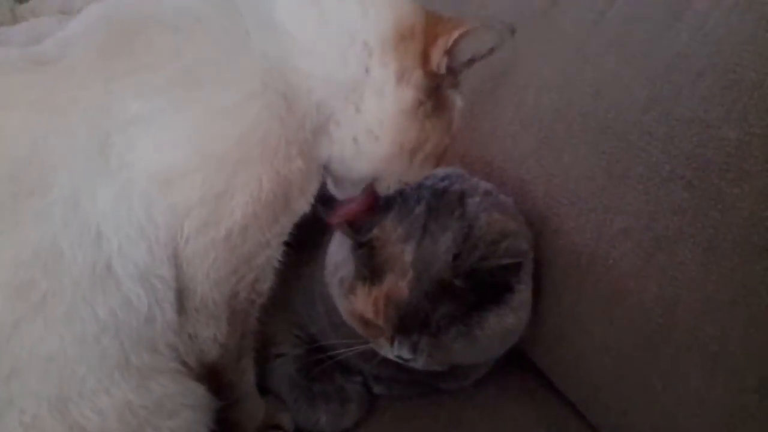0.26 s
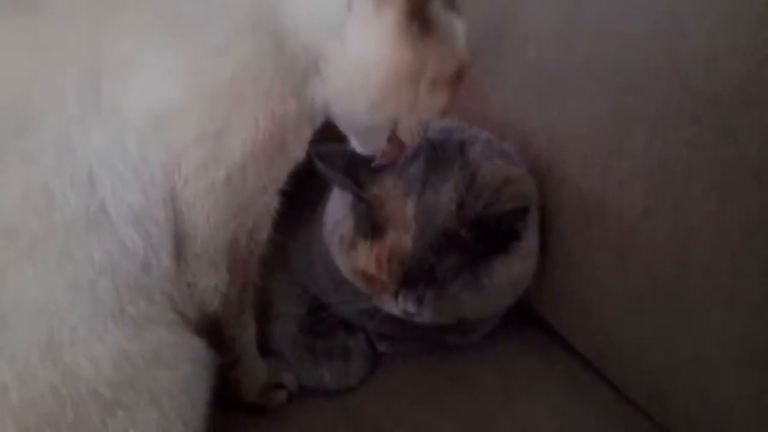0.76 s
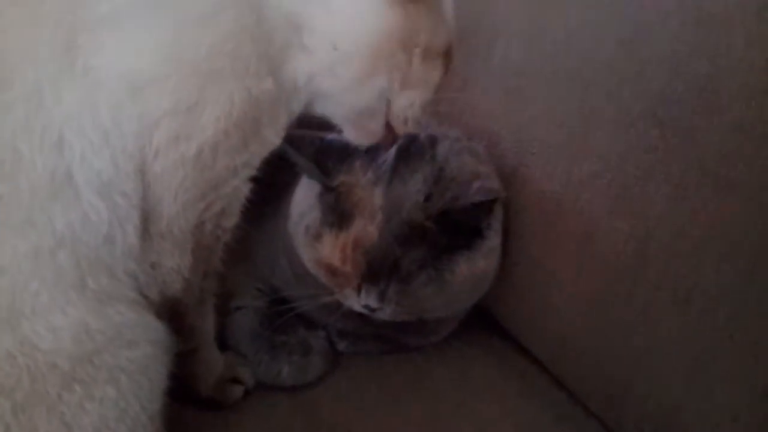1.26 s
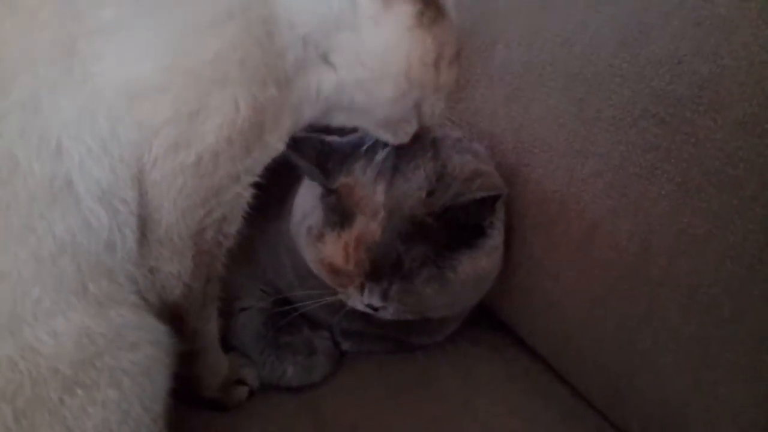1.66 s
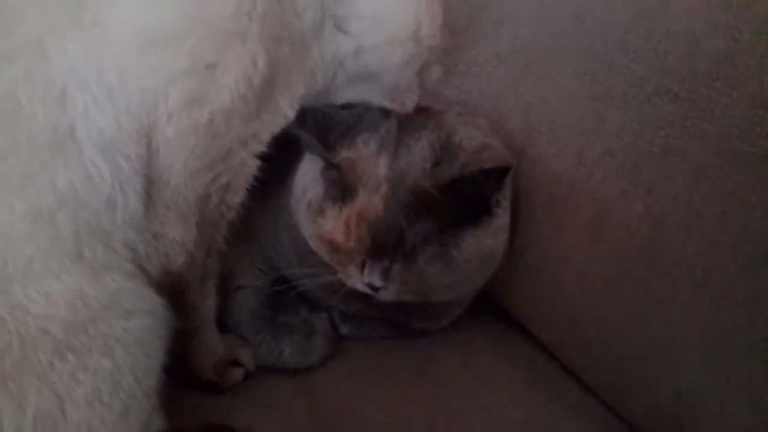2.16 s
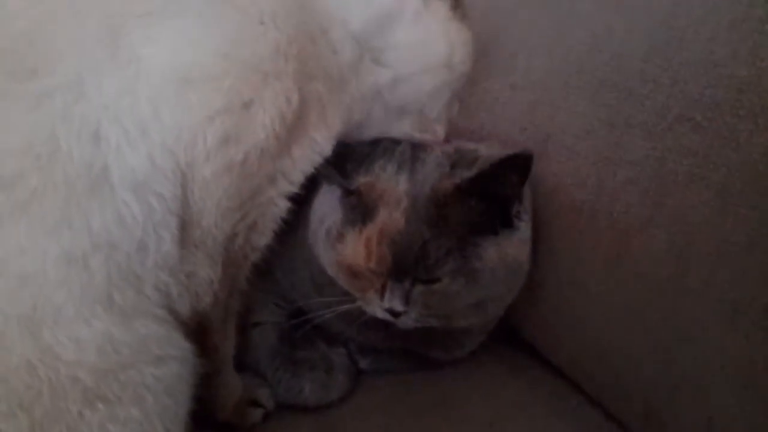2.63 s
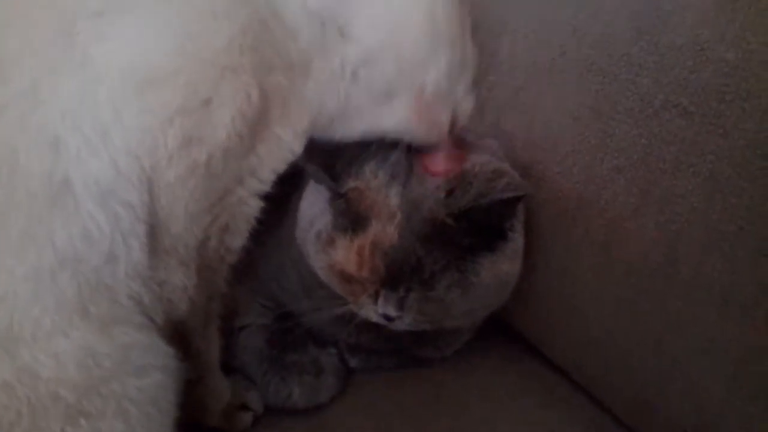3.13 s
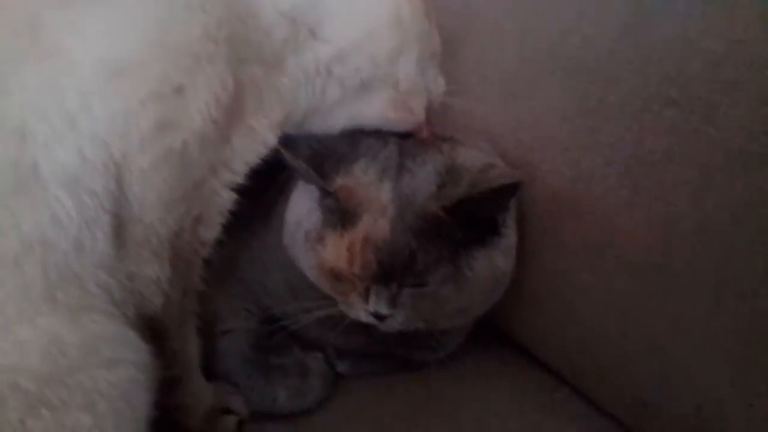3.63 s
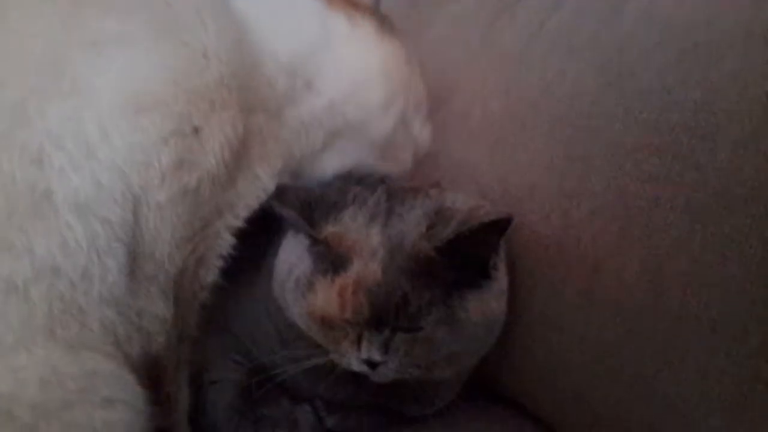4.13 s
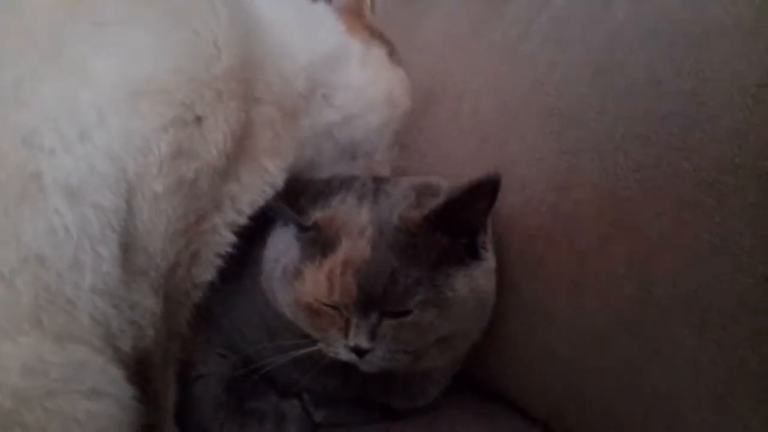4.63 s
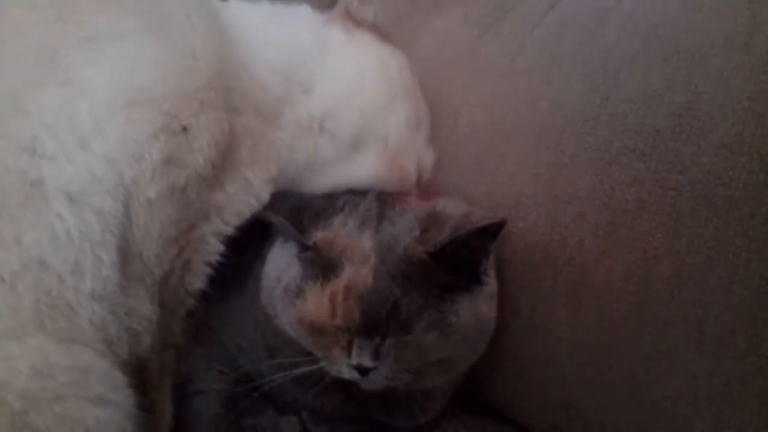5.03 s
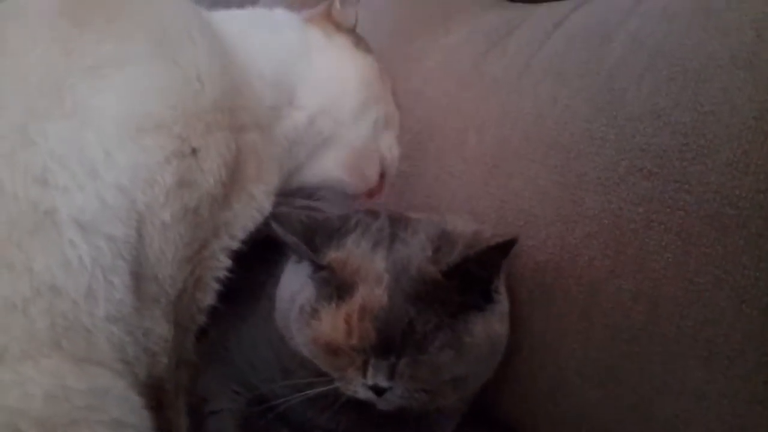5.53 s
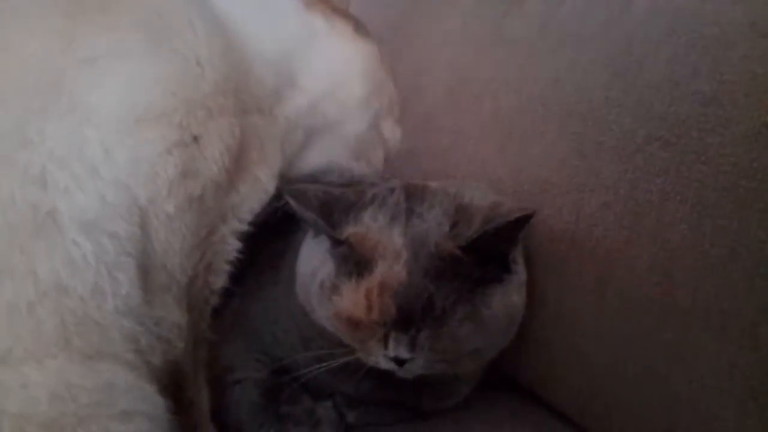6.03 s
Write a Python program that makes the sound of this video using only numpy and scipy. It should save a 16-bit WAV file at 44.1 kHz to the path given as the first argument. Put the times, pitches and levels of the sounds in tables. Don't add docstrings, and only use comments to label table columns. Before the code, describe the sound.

A quiet room with very faint low hum and slight hiss, heard through a close hand-held phone. At about 0.1 s a cat's rough tongue makes a crisp rasp through fur, followed by softer licks at 0.25, 0.35 and 0.5 s, with a sharp tick near 0.35 and a barely audible thin rising squeak around 0.45. From 0.6 to 1.7 s there is near silence with soft finger knocks and a brighter click at 1.16. Licking returns faintly at 1.7, then runs quickly from 1.85 to about 4.5 s, roughly four or five strokes a second, each a short bright swell with snapping hairs and an abrupt fade; one snap stands out at 3.23. Handling rumbles softly near 3.9, with clicks at 3.8 and 4.13 and the loudest, hard double click at 4.19. Strokes fade by 4.7 as rattly knocks cluster until 4.8; afterwards just quiet room tone.

```python
import sys
import numpy as np
from scipy import signal
from scipy.fft import rfft, irfft
from scipy.io import wavfile
from scipy.ndimage import uniform_filter1d

SR = 44100
rng = np.random.default_rng(int(sys.argv[2]) if len(sys.argv) > 2 else 0)


def natural_amplitude(level_db):
    exponent = np.asarray(level_db, float) / 20
    return 10 ** exponent


def inscribe(sig):
    pcm = np.round(np.clip(np.atleast_2d(sig).T, -1, 1) * 32767)
    wavfile.write(sys.argv[1], SR, pcm.astype(np.int16))


N = 277389

# full pull at [s], rasp level [dB], climb [s], hold [s], weight on the fur [dB].
STROKES = [(0.081, -46, 0.046, 0.0032, 3.5), (.243, -55, .07, 0, 7), (.342, -51.5, .024, 0, 4.5),
           (.494, -62, .045, .005, 1.5), (.545, -63.5, .05, .02, -3), (1.702, -66.5, 0.032, .005, -5.5),
           (1.845, -53, .026, 0.0022, -4), (2.05, -55, .06, 0.0021, 0.5), (2.205, -46.5, .045, 0.00084, -2),
           (2.34, -52, .06, .005, 3), (2.38, -48, .05, 0, -3), (2.555, -46, 0.059, .02, 0),
           (2.796, -43.5, 0.046, .012, 0), (3.0, -46, 0.083, .01, 1), (3.06, -53.5, .05, .01, -2.5),
           (3.233, -47.5, .07, .02, 0), (3.452, -46.5, .085, 0.0018, -1.5),
           (3.665, -48, 0.057, 0.028, -0.5), (3.885, -52, .055, .005, 4), (4.096, -53.5, 0.039, .02, 0.5),
           (4.17, -43.5, 0.045, .008, 4), (4.355, -56, .03, .01, 1), (4.531, -57, .016, 0.02, 0),
           (4.712, -69, .04, .03, 0)]
# frequency [Hz], level [dB per Hz].
RASP = [(3180, -39.5), (5400, -14.5), (5690, -12), (6540, -8), (7560, 0), (7770, 3), (8130, -5.5),
        (8400, -9.5), (10500, -35), (13600, -61.5), (22000, -120)]
# frequency [Hz], width [Hz], level [dB].
HOLLOW = [(2320, 500, -12.5), (3250, 1300, -8.5), (4185, 860, 2), (4868, 860, 1), (5530, 600, 1.5)]
# frequency [Hz], level [dB per Hz].
SIZZLE = [(9000, -9.5), (10300, 0), (12500, -7), (15500, -15.5), (16500, -40.5)]


def level(x, db):
    return x * natural_amplitude(db) / np.sqrt(np.mean(x ** 2))


def response(points, size=1024):
    hz, db = np.transpose(points)
    grid_hz = np.arange(size + 1) * SR / (2 * size)
    log_gain = np.interp(np.log(grid_hz + 1), np.log(hz), db) * np.log(10) / 20
    cepstrum = irfft(log_gain)
    cepstrum[1:size] *= 2
    cepstrum[size + 1:] = 0
    return irfft(np.exp(rfft(cepstrum)))[:size]


def colour(x, points):
    return signal.fftconvolve(x, response(points, size=8192))[:N]


def resonate(x, peaks):
    out = 0
    for k, (hz, width, db) in enumerate(peaks):
        b, a = signal.iirpeak(hz, hz / width, fs=SR)
        once = signal.lfilter(b, a, x)
        out = out + (-1) ** k * natural_amplitude(db) * signal.lfilter(b, a, once)
    return out


def ring(modes, size=2048):
    t = np.arange(size) / SR
    y = np.zeros(size)
    for hz, db, t60 in modes:
        y += natural_amplitude(db) * np.sin(2 * np.pi * hz * t) * np.exp(-np.log(1000) * t / t60)
    return y / np.abs(y).max()


def burst(kernel, length_s, noise):
    t = np.arange(len(noise)) / SR
    push = np.exp(-.5 * ((t - 3 * length_s) / length_s) ** 2)
    y = np.convolve(noise * push, kernel)
    return y / np.abs(y).max()


def add(out, s, x):
    i = int(s * SR) - np.argmax(np.abs(x))
    out[i:i + len(x)] += x[:N - i]


def walk(rate):
    k = int(SR / rate)
    steps = np.repeat(rng.standard_normal(N // k + 1), k)
    return 1.5 * uniform_filter1d(uniform_filter1d(steps, k), k)[:N]


def restless(x, peaks, wander_db, rate):
    out = 0
    for k, peak in enumerate(peaks):
        out = out + (-1) ** k * natural_amplitude(wander_db * walk(rate)) * resonate(x, [peak])
    return out


def room():
    # frequency [Hz], level [dB per Hz].
    quiet = [(12, -35), (20, -8), (32, -22), (101, -11.5), (228, -15), (277, -17.5), (319, -18.5),
             (472, -24.5), (513, -29.5), (558, -25.5), (802, -30.5), (1810, -36), (3950, -43.5),
             (7730, -41), (16000, -44)]
    # middle [s], half length [s], frequency [Hz], level [dB].
    hums = [
        (7.8, 0.046, 289, -74),
        (4.28, 0.0025, 830, -66),
    ]
    t = np.arange(N) / SR
    air = level(colour(rng.standard_normal(N) * natural_amplitude(0.88 * walk(4.8)), quiet), -76.5)
    for s, half, hz, db in hums:
        swell = np.exp(-.5 * ((t - s) / half) ** 2)
        air = air + natural_amplitude(db + 6.5) * swell * np.sin(2 * np.pi * hz * t)
    return air


def stroke_db(t, s, db, rise, hold, fade=271.5):
    rise_db, rise_bend = 28.5, 1.3
    settle_db, settle_db_per_s = -22, 52
    after = np.clip(t - s - hold, 0, None)
    climb = rise_db * np.clip((s - t) / rise, 0, 5) ** rise_bend
    fall = natural_amplitude(-fade * after) ** 2 + natural_amplitude(settle_db - settle_db_per_s * after) ** 2
    return db - climb + 10 * np.log10(fall)


def hairs(pull):
    per_s, scatter_db, biggest_db = 600, 5.0, 13
    slip_s, hiss = 0.00041, 0.54
    happens, size = rng.random((2, N))
    size_db = np.minimum(-scatter_db * np.log(1 - size), biggest_db)
    snaps = (happens < per_s / SR) * natural_amplitude(size_db)
    gate = signal.lfilter([1], [1, -np.exp(-1 / (slip_s * SR))], snaps)
    share = np.clip(pull * (1 - hiss), 0, 1)
    return np.sqrt(share * gate ** 2 / np.mean(gate ** 2) + 1 - share)


def tongue():
    # frequency [Hz], width [Hz], level [dB].
    fur = [(760, 680, 0.5), (1330, 1000, -6.5), (2200, 1800, -6.5)]
    # full pull at [s], rasp level [dB], climb [s], hold [s], fade [dB per s].
    brushes = [
        (.005, -70.5, .05, .03, 101.5),
        (.68, -78, .1, 0.059, 70.5),
        (1, -84.5, .03, 0.0299, 80.5),
        (4.85, -85, .08, .1, 50.5),
        (4.1, -58.5, .03, .01, 270),
        (3.185, -55.5, 0.024, .01, 272),
    ]
    t = np.arange(0, N + 64, 32) / SR

    def fine(curve):
        return np.interp(np.arange(N) / SR, t, curve)

    rows = [row[:4] for row in STROKES] + brushes
    power = np.array([natural_amplitude(stroke_db(t, *row)) ** 2 for row in rows])
    total = power.sum(axis=0)
    rasp_db = fine(10 * np.log10(total))
    weight_db = fine(np.array(STROKES)[:, 4] @ power[:len(STROKES)] / total)
    softer = np.clip(-45 - rasp_db, None, 50)
    hollow_db = -9.5 + .13 * softer
    drag_db = -23 + .42 * softer
    sizzle_db = -33 + 0.24 * softer
    climb_db_per_s = uniform_filter1d(np.gradient(rasp_db) * SR, 600)
    pull = np.clip(climb_db_per_s / 250 + 0.65, 0, 1)
    scrape = hairs(pull) * rng.standard_normal((4, N))
    rasp = level(colour(scrape[0], RASP), -0.97) * natural_amplitude(1.8 * walk(40))
    mouth = restless(scrape[1], HOLLOW + [(6900, 550, 2.3)], 3.0, 16)
    hollow = level(mouth, 0.087) * natural_amplitude(hollow_db + 1.8 * walk(25))
    drag = level(restless(scrape[2], fur, 1.3, 18), 0.087)
    drag = drag * natural_amplitude(drag_db + weight_db + 1.5 * walk(30))
    sizzle = level(colour(scrape[3], SIZZLE), 0.092) * natural_amplitude(sizzle_db)
    return natural_amplitude(rasp_db) * (rasp + hollow + drag + sizzle)


def chance_snags(count=5):
    over_db, scatter_db = 4, 5
    dull_db, dull_scatter_db = -16.5, 5.0
    rows = []
    for (s, db, rise, hold, _), draw in zip(STROKES, rng.random((len(STROKES), count, 3))):
        when = s + hold - (rise + hold) * draw[:, 0]
        size_db = stroke_db(when, s, db, rise, hold) + over_db + scatter_db * (2 * draw[:, 1] - 1)
        rows += zip(when, size_db, dull_db + dull_scatter_db * (2 * draw[:, 2] - 1))
    return rows


def snags():
    # time [s], peak level [dB], dull part against the peak [dB].
    loud_hairs = [(.062, -44, 11), (.0781, -35, -1), (.1912, -47, -25), (.219, -37, -20.5),
                  (.2384, -38, -16), (1.8293, -50.5, -1), (1.8445, -44.5, -16.5), (2.0574, -41.5, -9),
                  (2.1804, -55, 8), (2.1962, -40.5, -12), (2.313, -48, -16), (2.5442, -41, -16),
                  (2.533, -40.5, -21), (2.5827, -35, -25), (2.7489, -50, -8), (2.783, -38, -7),
                  (2.9269, -45, -14), (2.96, -41, -12), (3.0578, -35.5, -26), (3.2204, -41, -4),
                  (3.2332, -28, -20), (3.3963, -48, -8), (3.6606, -51, -4.5), (3.8613, -45, -21),
                  (3.885, -49, -10), (4.0787, -54, 10), (4.1518, -44.5, -4), (4.3344, -53, 11.5),
                  (4.5234, -46, 5)]
    rows = chance_snags() + list(loud_hairs)
    out = np.zeros(N)
    port = response(RASP)[:300]
    fizz = response(SIZZLE)[:100]
    dull = resonate(np.eye(1, 512)[0], HOLLOW)
    for (s, db, dull_db), noise in zip(rows, rng.standard_normal((len(rows), 128))):
        add(out, s, natural_amplitude(db - 0.5) * burst(port, 0.00029, noise))
        add(out, s, natural_amplitude(db - 21.0) * burst(fizz, .0001, noise))
        add(out, s, natural_amplitude(db + dull_db - 7.0) * burst(dull, 0.00036, noise[::-1]))
    return out


def case():
    # time [s], then tick, knock, thud and top levels [dB].
    clicks = [(0.2231, -35.5, -48.5, -57.5, -39), (.3235, -42.5, -60.5, -96, -85),
              (0.3454, -15, -42, -63, -37.5), (0.6027, -46.5, -41.5, -57, -81),
              (.9018, -45.5, -41.5, -63.5, -84), (1.1232, -49, -43, -60, -74), (1.1588, -23, -43, -39, -29),
              (2.646, -49, -36.5, -55.5, -80), (3.793, -23.5, -32.5, -48.5, -41),
              (4.1254, -22, -33, -52.5, -39), (4.1852, -7.5, -33, -43, -24), (4.186, -9, -31, -44.5, -32.5),
              (4.6975, -38, -33.5, -49, -57), (4.735, -32, -32, -49, -44), (4.7661, -35, -34.5, -42, -53),
              (4.8208, -39, -33, -43, -54)]
    # time [s], knock level [dB], thud level [dB].
    taps = [(.125, -41, -53), (0.2437, -42.5, -56), (0.3017, -43, -59), (0.3537, -41, -61),
            (.499, -47, -52), (0.8208, -48.5, -69), (0.9847, -44.5, -59), (1.1451, -56.5, -70.5),
            (1.2318, -43, -55), (2.8877, -55, -54), (3.71, -49, -50.5), (3.759, -52, -50.5),
            (4.5536, -62, -55.5), (4.638, -51.5, -52), (4.7782, -48, -73), (4.98, -64.5, -64)]
    # time [s], tick level [dB], knock level [dB], knock [Hz].
    rebounds = [
        (0.325, -41, -57, 1000),
        (0.8192, -80, -51.5, 1740),
        (1.158, -27.5, -51, 900),
        (1.1598, -30.5, -45.5, 860),
        (2.6436, -53, -40, 1000),
        (2.6447, -62, -46, 960),
        (4.1835, -24.5, -51.5, 900),
        (4.1868, -20.5, -36, 1250),
        (5.042, -69, -73, 2900),
    ]
    # frequency [Hz], level [dB per Hz].
    tick_colour = [(1500, -25), (2800, -25.5), (4200, -21.5), (5800, -19.5), (6700, -11.5), (7800, 1.5),
                   (8900, -8.5), (10000, -16), (12000, -29.5), (17000, -50)]
    # multiple of the knock frequency, level [dB], t60 [s].
    knock_tones = [(1.0, 8.5, .006), (1.5, 2, .007), (2.5, -9.5, .006), (3.6, -17, .005)]
    # frequency [Hz], level [dB], t60 [s].
    thud_tones = [(196.1, 6.5, 0.037), (304, -2, 0.023)]
    # frequency [Hz], level [dB], t60 [s].
    rattle_tones = [(1340, 4.5, 0.0049), (946, -11, 0.018), (550, -18, 0.013), (2060, -14.5, 0.0088),
                    (2980, -17, 0.0059)]
    knock_hz, stiff_from_s = 900, 4.66
    lead_s = 0.00068
    rows = [(s, tick, knock, knock_hz, thud, top) for s, tick, knock, thud, top in clicks]
    rows += [(s, knock - 20.5, knock, knock_hz, thud, -99) for s, knock, thud in taps]
    rows += [(s, tick, knock, hz, knock - 15.5, tick - 24) for s, tick, knock, hz in rebounds]
    out = np.zeros(N)
    tick = response(tick_colour)[:256] * np.hanning(512)[256:]
    top = resonate(np.eye(1, 128)[0], [(13900, 7400, 0)])
    thud = ring(thud_tones)
    push = np.hanning(12)
    for (s, tick_db, knock_db, hz, thud_db, top_db), noise in zip(rows, rng.standard_normal((len(rows), 128))):
        if s > stiff_from_s:
            knock = -ring(rattle_tones)
        else:
            knock = ring([(hz * k, db, t60) for k, db, t60 in knock_tones])
        knock = np.convolve(knock, push / push.sum())
        add(out, s - lead_s, natural_amplitude(tick_db + 1.2) * burst(tick, .000025, 1 + noise))
        add(out, s - lead_s, natural_amplitude(top_db + 1.14) * burst(top, .00006, noise))
        add(out, s, -natural_amplitude(knock_db + 2.5) * knock)
        add(out, s + .002, natural_amplitude(thud_db) * thud)
    return signal.sosfilt(signal.butter(2, 170, "high", fs=SR, output="sos"), out)


def squeak():
    from_s, to_s = .395, 0.5
    from_hz, to_hz = 4150.5, 4611
    u = np.clip((np.arange(N) / SR - from_s) / (to_s - from_s), 0, 1)
    hz = from_hz + (to_hz - from_hz) * u ** .8
    tone = np.sin(2 * np.pi * np.cumsum(hz) / SR)
    return natural_amplitude(-78 + 2.0 * walk(60)) * np.sin(np.pi * u) ** .5 * tone


def grip():
    middle_s, half_s = 3.93, .17
    rumble = resonate(rng.standard_normal(N), [(110, 165, 0)])
    rumble = level(rumble, -76.5) * natural_amplitude(3.0 * walk(20))
    return rumble * np.exp(-.5 * ((np.arange(N) / SR - middle_s) / half_s) ** 2)


def scene():
    return (room() + tongue() + snags() + case() + squeak() + grip())[None]


def band_limit(x):
    return signal.sosfilt(signal.butter(12, 16950, fs=SR, output="sos"), x)


def record(dry):
    low_pass = signal.cheby2(10, 40, 16600, fs=SR, output="sos")
    cut = signal.sosfiltfilt(low_pass, dry)
    return band_limit(cut - .0005)


dry = scene()
out = record(dry)
inscribe(out)
```